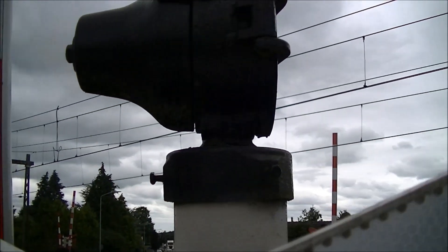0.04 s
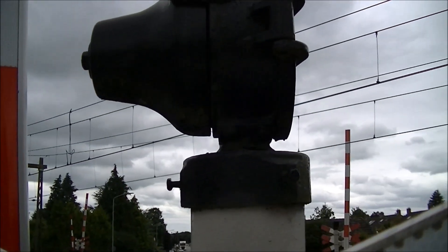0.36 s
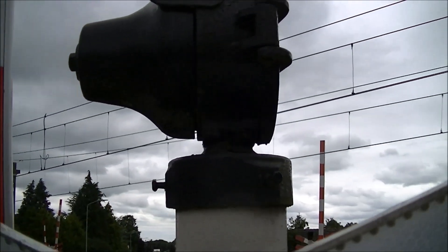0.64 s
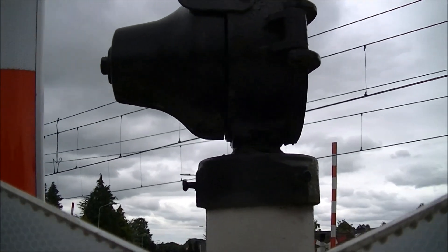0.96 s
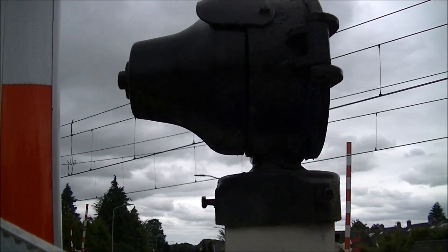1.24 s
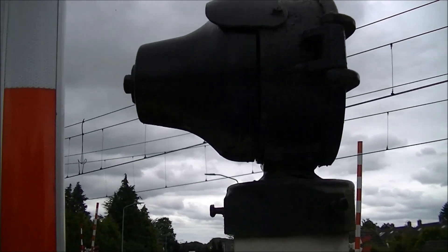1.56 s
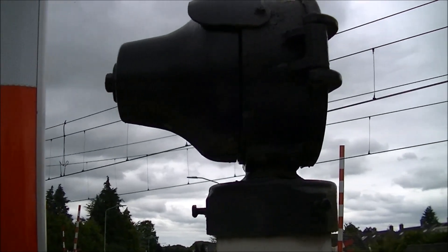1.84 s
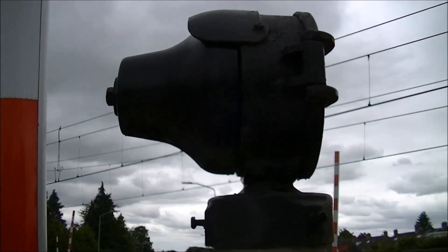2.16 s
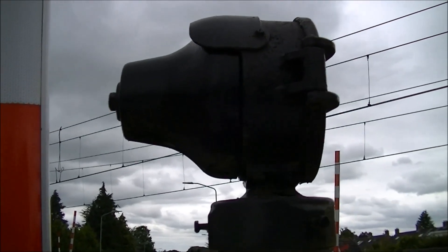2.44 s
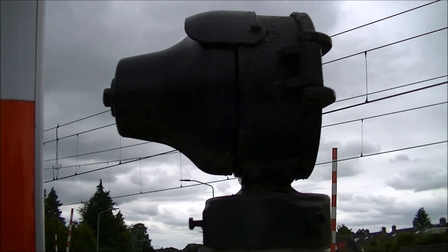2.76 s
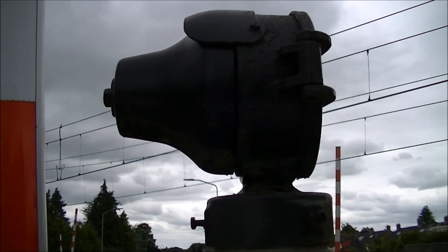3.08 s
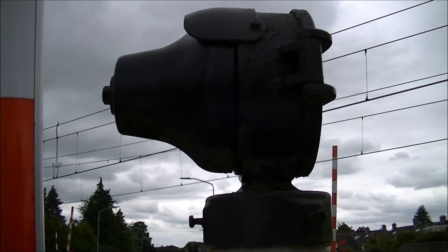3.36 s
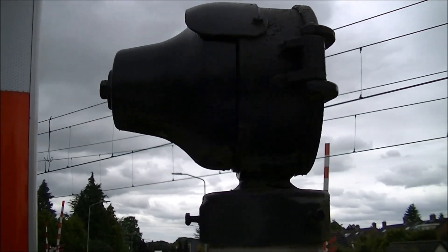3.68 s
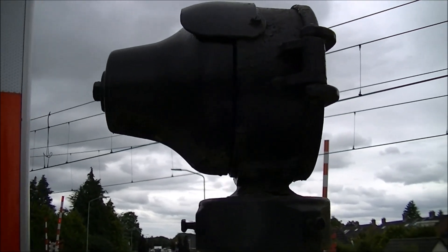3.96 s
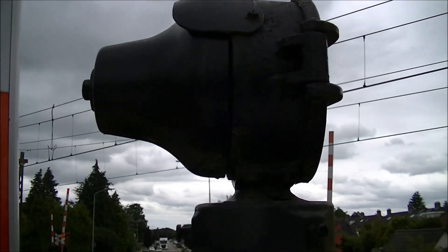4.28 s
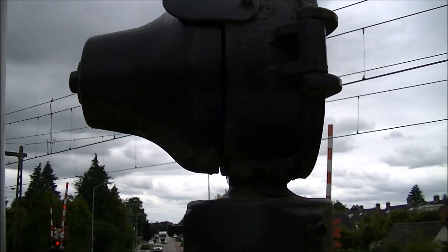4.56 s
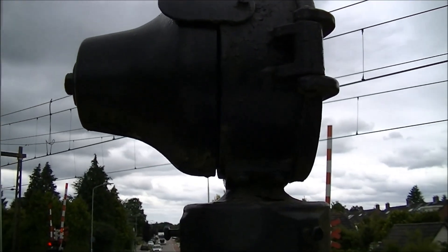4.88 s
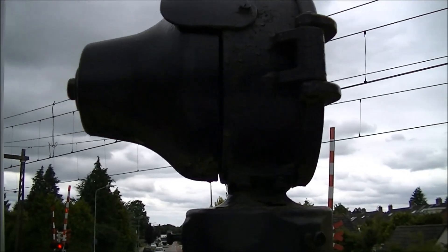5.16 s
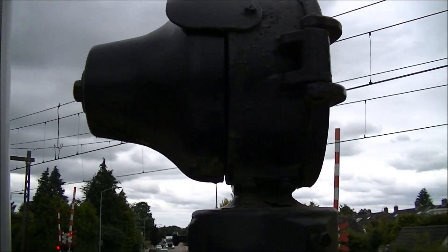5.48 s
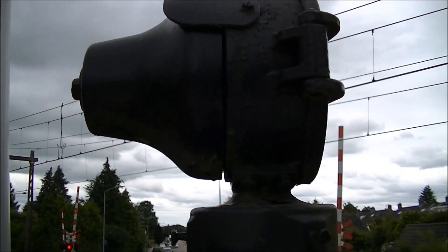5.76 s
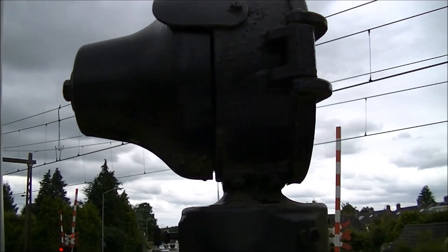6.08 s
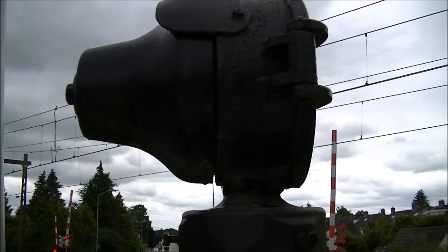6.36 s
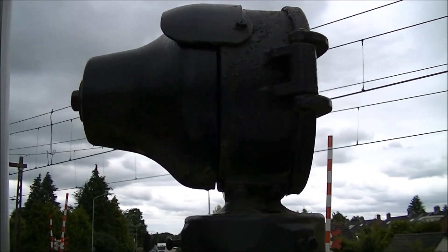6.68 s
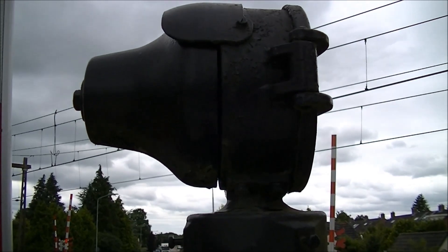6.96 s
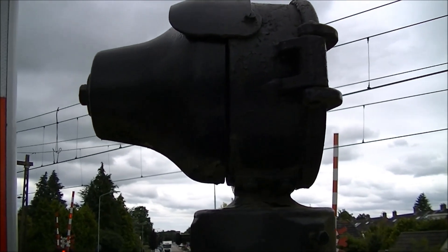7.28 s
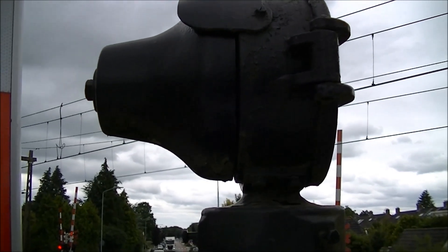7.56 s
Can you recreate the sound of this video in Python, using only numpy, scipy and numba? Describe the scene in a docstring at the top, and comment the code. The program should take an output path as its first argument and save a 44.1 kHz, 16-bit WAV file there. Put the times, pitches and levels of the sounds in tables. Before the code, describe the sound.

Outdoors at a level crossing, tyre roar and engine hum swell and fade as two vehicles pass close together. Then a very close warning bell begins: a hammer hits a steel gong in rapid, sharp, loud clangs, its lever ticking before each one and the ring swelling afterwards. A distant second bell adds a slightly quicker beat, with faint traffic underneath.

```python
"""Two vehicles rush past a level crossing, one close behind the other, and their tyre roar recedes.
Then a mechanical bell starts up, very close: a hammer hits a steel gong about four times a second,
and its linkage ticks just before each blow. A second gong joins farther off.
A limiter ducks at every blow, so the ring swells up after it."""
import sys
import numpy as np
from scipy import signal
from scipy.fft import rfft, irfft, next_fast_len
from scipy.io import wavfile
from scipy.ndimage import map_coordinates
from numba import njit

SR = 44100
rng = np.random.default_rng(int(sys.argv[2]) if len(sys.argv) > 2 else 0)


def dump_mix(stems):
    """Bounce the given channels to the path in sys.argv[1] as a 16-bit WAV at rate SR."""
    frames = np.atleast_2d(stems).T  # one column per channel
    limited = np.clip(frames, -1, 1)  # hard clip at full scale
    pcm = np.round(limited * 32767).astype(np.int16)
    wavfile.write(sys.argv[1], SR, pcm)


N = 345303


def from_db(db):
    return 10 ** (np.asarray(db) / 20)


def rms_one(x):
    return x / np.sqrt(np.mean(x ** 2) + 1e-20)


def clock():
    return np.arange(N) / SR


def automation(points):
    """A curve of (time_s, value) at every sample."""
    return np.interp(clock(), *np.transpose(points))


def eq(x, points):
    """Filter by a curve of (freq_hz, gain_db)."""
    size = next_fast_len(N)
    hz, db = np.transpose(points)
    bins = np.maximum(np.fft.rfftfreq(size, 1 / SR), 1)
    gain = from_db(np.interp(np.log(bins), np.log(hz), db))
    return irfft(rfft(x, size) * gain, size)[:N]


def band(x, hz, kind, order=2):
    """Filter, then bring to rms 1."""
    return rms_one(signal.sosfilt(signal.butter(order, hz, kind, fs=SR, output="sos"), x))


def noise(spectrum):
    """Coloured noise without subsonics, rms 1."""
    return band(eq(rng.standard_normal(N), spectrum), 40, "high")


def drift(rate_hz):
    """Smooth random modulation, rms 1."""
    knots = rng.standard_normal(int(N / SR * rate_hz) + 4)
    return rms_one(map_coordinates(knots, [clock() * rate_hz + 1], order=3))


def bursts(times, levels_db, t60_s):
    """Envelope that jumps at each time and dies away."""
    kicks = np.zeros(N)
    kicks[np.round(np.asarray(times) * SR).astype(int)] = from_db(levels_db)
    return signal.lfilter([1], [1, -from_db(-60 / (t60_s * SR))], kicks + 1e-18)


# Opening gust: time_s, level_db
WIND_LEVEL = [(0, -41), (.2, -33), (.32, -47), (2, -69), (7.8, -67)]

def wind(width=.38):
    """Low buffeting, partly different on each microphone."""
    shared, side = band(rng.standard_normal((2, N)), [55, 120], "band")
    return from_db(automation(WIND_LEVEL)) * (shared + width * side * np.array([[1], [-1]]))


def hum(hz, orders, wander, waver_db=1.5):
    """Engine orders (multiple, level_db) at a slightly unsteady speed."""
    phase = 2 * np.pi * np.cumsum(hz * (1 + wander * drift(8))) / SR
    return np.sqrt(2) * sum(from_db(db + waver_db * drift(9)) * np.sin(k * phase) for k, db in orders)


# Fader rides for the near engine, distant motor, low drone and street wash: time_s, gain_db
ENGINE_FADER = [(.3, -43), (.6, -33.5), (1.25, -29), (1.7, -32.5), (2.05, -58), (2.6, -70)]
MOTOR_FADER = [(2.6, -70), (2.85, -45.5), (3.3, -46), (3.7, -40.5), (4.2, -52), (7.8, -70)]
DRONE_FADER = [(0, -53), (1.3, -47), (3.3, -47.5), (7.8, -60)]
STREET_FADER = [(0, -30.5), (3.2, -35.5), (3.9, -26.5), (4.6, -34.5), (7.8, -36)]
# Colour of the street wash: freq_hz, gain_db
STREET_SPECTRUM = [(30, -11), (70, -19), (115, -4), (160, 5), (210, -6), (280, -9), (350, -1.5),
                   (450, -10.5), (700, -3.5), (1400, -1.5), (3400, -10.5), (7400, -27.5), (15000, -44)]

def traffic():
    """Engine notes and a low drone over the wash of the street."""
    engine = hum(53.2, [(2, -5.73), (3, -6), (4, -6.4)], wander=.0095)
    motor = hum(91, [(1, 0), (2, -7)], wander=.02)
    drone = band(rng.standard_normal(N), [48, 63], "band")
    layers = [(engine, ENGINE_FADER), (motor, MOTOR_FADER), (drone, DRONE_FADER),
              (noise(STREET_SPECTRUM), STREET_FADER)]
    return sum(from_db(automation(fader)) * layer for layer, fader in layers)


def resonance(centre_hz, half_width_hz):
    """Narrow noise around a gliding pitch, rms 1."""
    white = rng.standard_normal(N) + 1j * rng.standard_normal(N)
    slow = signal.sosfilt(signal.butter(2, half_width_hz, fs=SR, output="sos"), white)
    return rms_one((slow * np.exp(2j * np.pi * np.cumsum(centre_hz) / SR)).real)


# Colour of tyres on the road: freq_hz, gain_db
ROAD_SPECTRUM = [(35, -42), (60, -14), (76, -13), (103, -12), (130, -30), (153, -15.5), (212, -6.5),
                 (238, -9.5), (480, -5.5), (732, -5), (1780, 8), (3420, -8), (7940, -27.5), (12700, -43),
                 (16000, -64)]
# Tyres knocking over the rails: time_s, level_over_roar_db
RAIL_KNOCKS = [(1.815, -9), (1.876, -3), (1.919, 6), (1.93, -9)]

def vehicle(pass_by, tread_pitch, body_ratio=.27, clear_lead_s=.29, clearing_s=.054):
    """Body rumble, tyre roar and hiss swell and fade with distance; resonances sink as it goes by."""
    nearest_s, travel_s, rumble_db, roar_db, tread_db, hiss_db, sizzle_db = pass_by
    since_s = clock() - nearest_s
    tread_hz = automation(tread_pitch)
    distance = np.hypot(1, since_s / travel_s)  # 1 when nearest
    doublings = np.log2(distance)
    road = noise(ROAD_SPECTRUM)
    body = .24 * resonance(body_ratio * tread_hz, 55)
    rumble = rms_one(band(road, [120, 880], "band", order=3) + body)
    rumble *= from_db(rumble_db - 6 * doublings)

    roar = from_db(roar_db) * band(noise(ROAD_SPECTRUM), [700, 3500], "band", order=3)
    roar += from_db(tread_db) * resonance(tread_hz, 125)
    hiss = from_db(hiss_db - 10.5 * doublings) * band(road, 4700, "high", order=3)
    sizzle = from_db(sizzle_db - 22 * doublings) * band(noise(ROAD_SPECTRUM), 11000, "high", order=3)
    knocks = 1 + bursts(*np.transpose(RAIL_KNOCKS), t60_s=.037)
    facing_db = -.5 * since_s / travel_s / distance  # a touch louder on the approach
    screened_db = -np.clip(.5 - (since_s + clear_lead_s) / clearing_s, 0, 1)  # until it is in the open
    flutter_db = .5 * drift(60)
    roar *= knocks * from_db(facing_db + screened_db + flutter_db - 7 * doublings)
    return rumble + roar + hiss + sizzle


# One pass-by per vehicle; travel is the time it takes to cover its nearest distance:
# nearest_s, travel_s, rumble_db, roar_db, tread_db, hiss_db, sizzle_db
PASS_BYS = [(.92, 0.4, -23.5, -26.5, -23, -32, -70), (1.53, .46, -28, -19, -24, -36, -49)]
# Glide of the tread resonance, one curve per vehicle: time_s, pitch_hz
TREAD_GLIDES = [
    [(.3, 1251), (.75, 1260), (1.0, 1158), (1.4, 1075)],
    [(0, 1608), (.6, 1754), (1.18, 2280), (1.28, 1748), (1.5, 1686), (2.0, 1450), (2.4, 1361), (3.4, 1343)],
]
# Comb from the ground reflection: time_s, notch_spacing_hz, strength_ratio
GROUND_COMB = [(1.1, 1504, 0), (1.4, 1430, 0.1), (1.75, 1220, 0.85), (2.05, 1077, 0.75), (2.35, 941, 0.6),
               (3.4, 977, 0.88)]

def passing_vehicles(lag_turns=.2):
    """The vehicles, combed by a ground reflection whose delay grows as they leave."""
    t = clock()
    direct = sum(vehicle(pass_by, glide) for pass_by, glide in zip(PASS_BYS, TREAD_GLIDES))
    comb_s, *curves = np.transpose(GROUND_COMB)
    spacing_hz, strength = (np.interp(t, comb_s, curve) for curve in curves)
    # At a grazing angle the reflection comes back inverted, dulled and lagging in phase.
    dulled = eq(direct, [(400, 1), (1300, -2.5), (3300, 4), (7000, -58)])
    lagged = (signal.hilbert(dulled, next_fast_len(N))[:N] * np.exp(-2j * np.pi * lag_turns)).real
    reflection = np.interp(t - 1 / spacing_hz, t, lagged)
    return (direct - strength * reflection) / np.sqrt(1 + strength ** 2)


# Shimmer across the gong modes: pitch_hz, depth_ratio
SHIMMER_DEPTH = [(620, 0), (1150, 0.89), (1930, 0.091), (2900, 1.14)]

def shimmer(t, hz, base_depth_db=3.2, rates_hz=(5, 13), slower_below_hz=3300):
    """Level swings in dB, one row per mode, each at its own rate; low modes swing slowly."""
    pace = np.minimum(hz / slower_below_hz, 1)[:, None]
    rate_hz = pace * rng.uniform(*rates_hz, (len(hz), 1))
    phase = 2 * np.pi * (rate_hz * t + rng.random((len(hz), 1)))
    depth_db = base_depth_db * np.interp(hz, *np.transpose(SHIMMER_DEPTH))[:, None]
    fade_in = np.minimum(t * rates_hz[1], 1)
    return depth_db * np.sin(phase) * fade_in


def struck(times, strengths, hz, t60_s, survives, contact_s, attack_s):
    """Each blow (a row of mode strengths) adds to the surviving ring, in step with it or against it."""
    starts = np.round(times * SR).astype(int)
    gaps_s = np.diff(starts, append=N) / SR
    t = np.arange(SR // 3) / SR
    poles = 2j * np.pi * hz - np.log(1000) / t60_s
    decays = np.exp(poles[:, None] * t)
    rise = 1 - np.exp(-t / attack_s)
    out, carried = np.zeros(N + len(t)), np.zeros(len(hz))
    for start, gap_s, strength in zip(starts, gaps_s, strengths):
        ring = ((carried[:, None] + strength[:, None] * rise) * decays).imag
        # The next hammer contact chokes the share that is not carried over.
        choked = np.reshape(1 - survives, (-1, 1)) * np.exp(-np.maximum(t - gap_s, 0) / contact_s)
        damping = np.where(t < gap_s, 1, choked)
        out[start:start + len(t)] += (ring * from_db(shimmer(t, hz)) * damping).sum(axis=0)
        carried = (carried + strength) * survives * np.exp(poles * gap_s)
    return out[:N]


# Partials of the far gong: pitch_hz, relative_db
FAR_MODES = [(747, 9), (1999, 14), (2923, 15), (1118, 12), (4039, 6)]
# The far gong coming through more and more clearly: time_s, gain_db
FAR_FADER = [(4.2, -51), (5, -51), (6, -42.5), (7, -42.5), (7.83, -42)]

def far_gong(start_s=4.22, beat_s=.19, jitter_s=.008, trim_db=7, scatter_db=2, flutter_db=4):
    """A second gong keeps its own quicker beat; only its long partials carry, fluttering on the way."""
    hz, mode_db = np.transpose(FAR_MODES)
    times = np.arange(start_s, N / SR - beat_s / 2, beat_s)
    chance = rng.standard_normal((len(times), len(hz) + 1))
    times += jitter_s * chance[:, 0]
    fader_db = np.interp(times, *np.transpose(FAR_FADER))[:, None]
    strengths = from_db(trim_db + fader_db + mode_db + scatter_db * chance[:, 1:])
    ring = struck(times, strengths, hz, t60_s=2.24, survives=.47, contact_s=.0038, attack_s=.0056)
    return ring * from_db(flutter_db * drift(28))


# Hammer blows, which cue the linkage, hammer and near gong: start_s, force_db
BLOWS = [(3.4742, .3), (3.7084, .3), (3.922, 0), (4.139, .5), (4.3875, -.6), (4.635, 0), (4.8661, .8),
         (5.0994, .5), (5.3331, .5), (5.5758, .3), (5.8258, .6), (6.0709, -.3), (6.2881, -.8), (6.511, -.2),
         (6.7412, 0), (6.957, -.5), (7.1963, -1.1), (7.4199, -1), (7.6349, -.3)]
# Colour of a lever tick: freq_hz, gain_db
TICK_SPECTRUM = [(300, -23), (1500, 3), (3000, 1.5), (5000, -1.5), (8000, 1.5), (11500, -9), (14500, -37)]

def linkage(lead_s=.096, bounce_s=.045, tick_db=-25, first_tick_db=-38):
    """Before each blow, and once more in rhythm, the lever lifts with a tick, a bounce and a rattle."""
    blows = np.array(BLOWS)[:, 0]
    lifts = np.append(blows, blows[-1] + np.diff(blows).mean()) - lead_s
    lift_db = np.full(len(lifts), tick_db)
    lift_db[0] = first_tick_db  # the lift from rest is soft and has no bounce
    bounces = lifts[1:] + bounce_s * rng.uniform(.7, 1.3, len(lifts) - 1)
    times = np.append(lifts, bounces)
    level_db = np.append(lift_db, lift_db[1:] - 21)
    ticks = bursts(times, level_db, t60_s=.039)
    rattle = bursts(times, level_db - 9, t60_s=.35)
    return (ticks + rattle) * noise(TICK_SPECTRUM)


# Colours of the contact crack and the housing's dense ring: freq_hz, gain_db
CRACK_SPECTRUM = [(60, -37), (250, -52), (700, 5.5), (1600, -7), (3000, 2), (5200, 8.5), (7000, 8),
                  (10000, -42), (15500, -27)]
HOUSING_SPECTRUM = [(200, -7), (1500, -2), (3200, -19), (5000, 2), (7400, -11), (9500, -9), (11000, -17),
                    (15500, -26)]
# Metallic clank of hammer and housing: pitch_hz, level_db, t60_s
CLANK_MODES = [(2990, -9, .05), (3390, -16, .06), (4962, -18, .18), (5370, -9, .05), (6680, -11, .03),
               (7397, -33, .3), (8590, -37, .3), (9790, -28, .25), (11030, -39, .3), (12122, -37, .2),
               (12972, -39, .2), (14918, -43, .2)]

def hammer(crack_db=4.5, housing_db=-19.5):
    """The hard contact cracks, and hammer and housing ring briefly."""
    times, force_db = np.transpose(BLOWS)
    crack = bursts(times, crack_db + force_db, t60_s=.018) * noise(CRACK_SPECTRUM)
    clank = sum(bursts(times, db + force_db, t60_s) * np.sin(2 * np.pi * hz * clock())
                for hz, db, t60_s in CLANK_MODES)
    housing = bursts(times, housing_db + force_db, t60_s=.22) * noise(HOUSING_SPECTRUM)
    return crack + clank + housing


# Modes of the near gong, whose close pairs beat: pitch_hz
GONG_PITCHES = [623.85, 1122.65, 1206.7, 1920.8, 1951.6, 2369, 2928.5, 3741, 3883, 4045.5, 4242, 4564, 4802,
                4926, 5140, 5274.5, 5601, 5978, 6580, 6625.5, 6944, 8044, 8067, 8125, 8722, 9449, 9668,
                11375, 13200, 15143]
# Ring of those modes, in the same order: level_db, t60_s
GONG_RING = [(-16, 25), (-14, 46), (-13, 21), (-4, 2.52), (-3.5, 1.88), (-17.5, 0.62), (-8.5, 1.1),
             (-26, 0.25), (-11, 0.38), (-1, 0.43), (-12, 0.32), (-17.5, 0.2), (-8, 0.13), (-19, 0.41),
             (-20, .3), (-0.5, 0.12), (-12, 0.45), (-25.5, 0.55), (-15.5, 0.49), (-6.5, 0.5), (-33, 0.82),
             (-15, 0.24), (-5, 0.24), (-10.5, 0.25), (-26.5, 0.25), (-20, 0.23), (-8.5, 0.21),
             (-24.5, 0.22), (-30, 0.21), (-35, 0.24)]
# Ring that survives a blow; the hammer stops all but the low modes: pitch_hz, surviving_ratio
RING_SURVIVAL = [(620, .5), (1120, .35), (1900, 0)]
# Tone of the gong before and after the microphone moves: freq_hz, before_db, after_db
MIC_PERSPECTIVES = [(620, -3, -2.5), (1200, -3, -4), (1950, 1.5, 0.5), (2400, 0, -1.5), (2930, -11.5, 0),
                    (3873, 5, -4.5), (4200, 9.5, 0), (5600, 5.5, -0.6), (6600, -0.5, -1), (9000, 1.7, 1.3)]

def near_gong(move_s=(4.06, 4.45), scatter_db=1.92):
    """The struck steel radiates unevenly, so its tone shifts as the microphone moves round it."""
    times, force_db = np.transpose(BLOWS)
    hz = np.array(GONG_PITCHES)
    mode_db, t60_s = np.transpose(GONG_RING)
    tone_hz, *tones = np.transpose(MIC_PERSPECTIVES)
    before_db, after_db = (np.interp(hz, tone_hz, tone) for tone in tones)
    moved = np.interp(times, move_s, [0, 1])[:, None]
    tone_db = (1 - moved) * before_db + moved * after_db
    blow_db = force_db[:, None] + scatter_db * rng.standard_normal((len(times), len(hz)))
    # Neighbouring modes start in opposite directions, so a pair swells out of a null.
    polarity = (-1) ** np.arange(len(hz))
    strengths = polarity * from_db(mode_db + blow_db + tone_db)
    survives = np.interp(hz, *np.transpose(RING_SURVIVAL))
    return struck(times, strengths, hz, t60_s, survives, contact_s=.0045, attack_s=.0001)


# Stereo width, as side against mid: freq_hz, side_db
STEREO_WIDTH = [(30, -11), (70, -30), (130, -64), (260, -99), (1000, -38.5), (2000, -29), (8000, -21),
                (15000, -32)]

def scene():
    """Bell, road and wind on two microphones that sit close together and hear almost the same."""
    bell = near_gong() + hammer() + linkage() + far_gong()
    road = passing_vehicles() + traffic()
    quadrature = signal.hilbert(bell + road, next_fast_len(N)).imag[:N]
    side = eq(quadrature, STEREO_WIDTH)
    panned = bell * from_db([[.1], [-.1]]) + road * from_db([[.25], [-.25]])
    return panned + np.array([side, -side]) + wind()


@njit
def limiter_gain(peaks, ceiling, attack, release):
    """The gain drops quickly when the output passes the ceiling and creeps back towards one."""
    gain, g = np.empty(len(peaks)), 1.0
    for i in range(len(peaks)):
        if peaks[i] * g > ceiling:
            g += attack * (ceiling / peaks[i] - g)
        else:
            g += release * (1 - g)
        gain[i] = g
    return gain


def record(dry, ceiling=.72, attack_s=.00024, release_s=.3, cutoff_hz=15650):
    """A limiter ducks each blow; what slips through is clipped, and the top is cut."""
    attack = 1 - np.exp(-1 / (attack_s * SR))
    gain = limiter_gain(np.abs(dry).max(axis=0), ceiling, attack, 1 / (release_s * SR))
    clipped = np.clip(dry * gain, -.95, .95)
    return signal.sosfilt(signal.ellip(10, .1, 70, cutoff_hz, fs=SR, output="sos"), clipped)


dry = scene()
out = record(dry)
dump_mix(out)
```